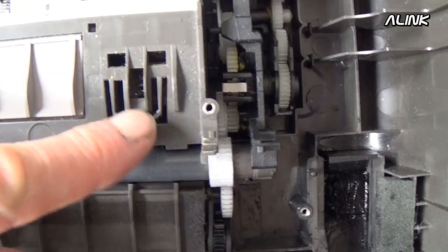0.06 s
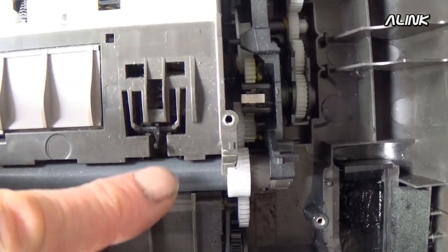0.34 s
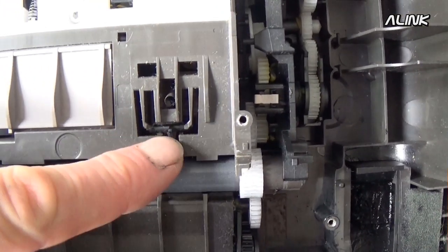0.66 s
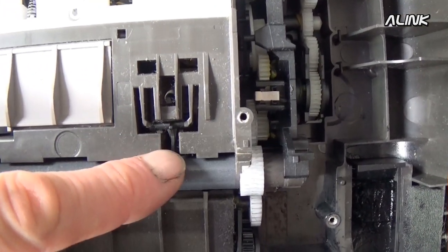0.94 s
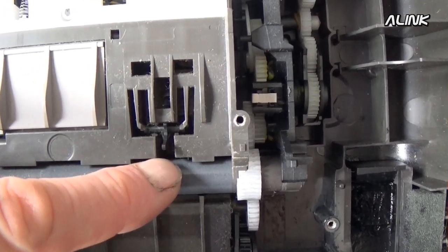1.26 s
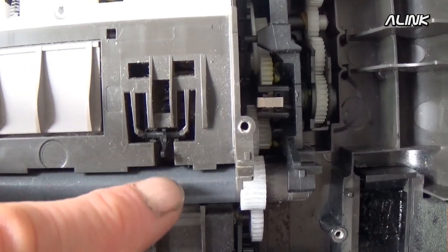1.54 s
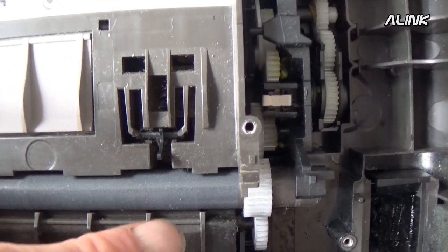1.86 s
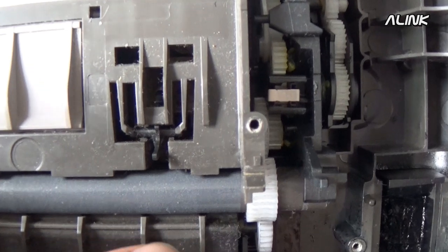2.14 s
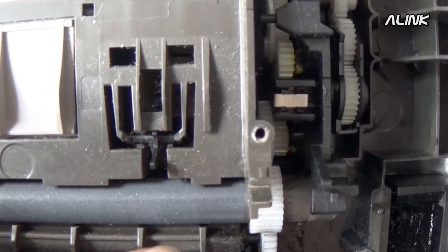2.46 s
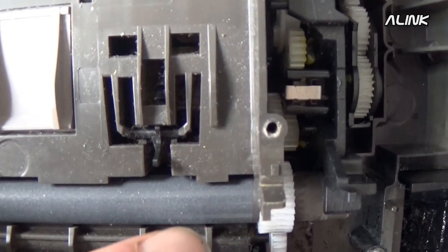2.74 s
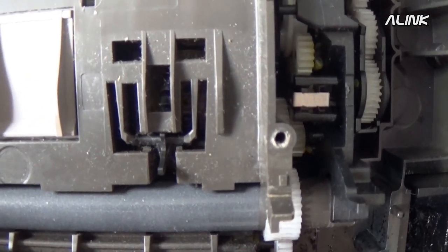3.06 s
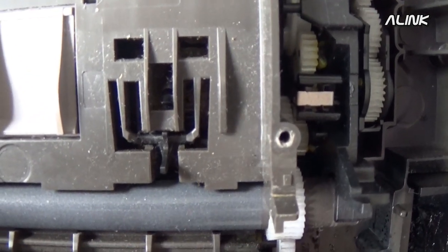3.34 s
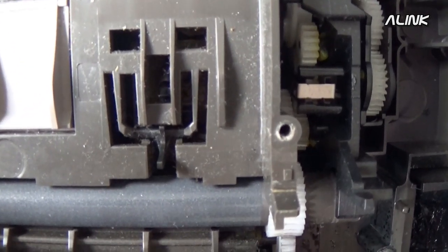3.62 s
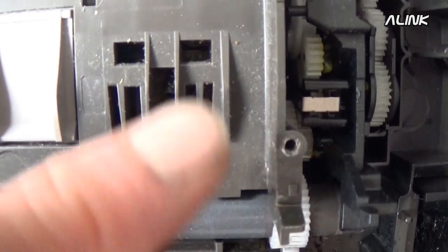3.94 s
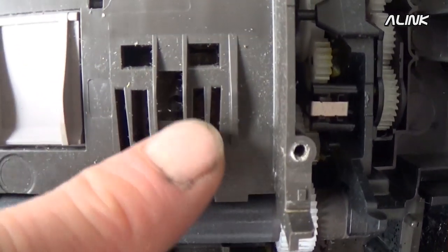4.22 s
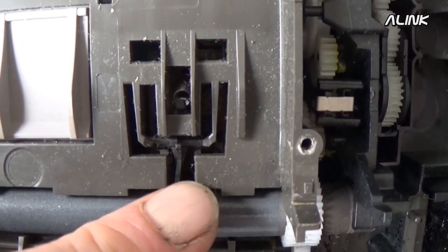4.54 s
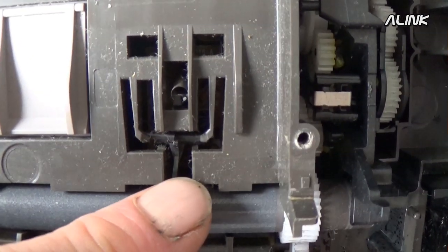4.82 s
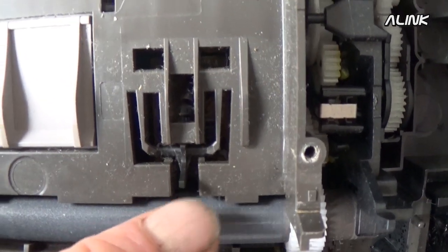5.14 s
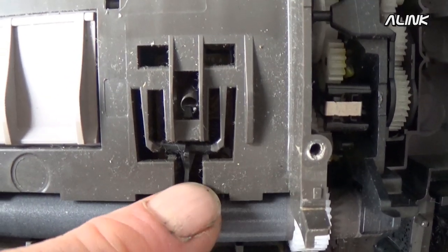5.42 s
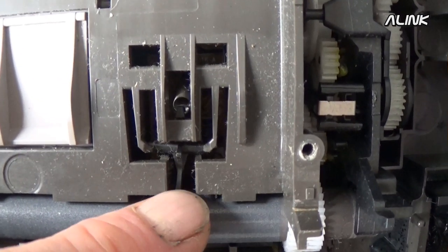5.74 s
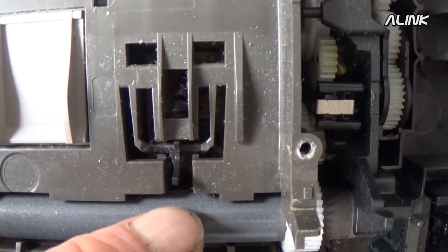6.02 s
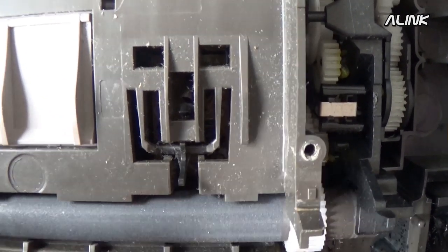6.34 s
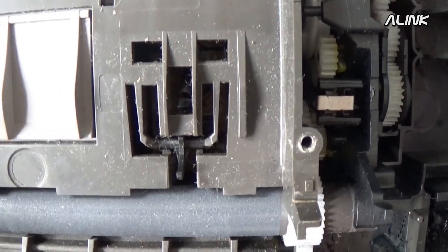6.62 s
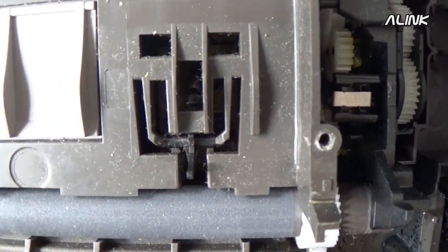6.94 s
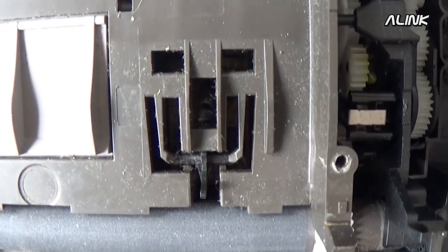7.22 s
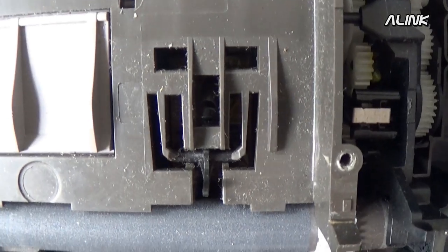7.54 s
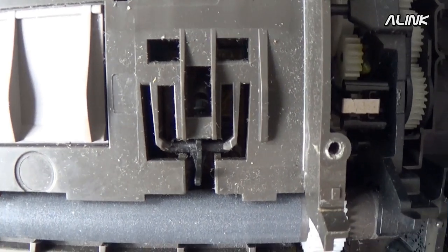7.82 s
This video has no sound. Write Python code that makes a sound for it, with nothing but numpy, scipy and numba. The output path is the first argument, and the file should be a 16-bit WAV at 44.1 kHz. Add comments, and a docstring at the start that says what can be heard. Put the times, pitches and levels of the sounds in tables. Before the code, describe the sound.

Sharp plastic snaps, each with a short metallic ring from a spring, come from a printer's paper lever worked by hand near the microphone. A quiet stretch leaves only room hum, hiss and soft finger rubbing. The lever then clicks, knocks and snaps again, before a loud creak and a dull boom through the workbench. Softer creaks from the feed roller close the sequence.

```python
"""A humming room, with a camera close to an opened inkjet printer.
A finger flicks the spring-loaded paper lever: it clicks, knocks the plastic chassis and leaves its
coil spring ringing. The finger rubs and squeaks on the plastic; then the feed roller is pushed and
creaks by stick-slip, and the bench booms. The camera's limiter ducks everything on the loud snaps."""
import sys
import numpy as np
from scipy import signal
from scipy.fft import irfft, next_fast_len
from scipy.io import wavfile
from scipy.ndimage import uniform_filter1d
from numba import njit

SR = 44100
rng = np.random.default_rng(int(sys.argv[2]) if len(sys.argv) > 2 else 0)


def store_wav(level_fs):
    """Save 16-bit WAV to argv[1]."""
    pcm = np.round(np.clip(np.atleast_2d(level_fs), -1, 1) * 32767)
    wavfile.write(sys.argv[1], SR, pcm.T.astype(np.int16))


N = 351918
T = np.arange(N) / SR

# rumble contour: time_s, relative_db
RUMBLE_CONTOUR = [(0.0, -51.5), (0.82, -48.5), (1.76, -52.5), (4.44, -48), (5.13, -52), (6.36, -49.5),
                  (6.51, -47), (7.34, -46.5), (7.98, -46.5)]
# room hum: pitch_hz, level_db
HUM_TONES = [(64.6, -76), (129.2, -74.5), (177.6, -66), (242.2, -68)]
# spectra of room rumble, microphone hiss, friction grit, lever tick: freq_hz, gain_db
RUMBLE_SPECTRUM = [(30, -31), (41, -9.5), (62, -1), (76, -3), (92, -17.5), (128, -6), (152, -12),
                   (180, -3.5), (220, -15), (290, -13), (400, -20), (700, -19.5), (850, -31.5), (1500, -33)]
HISS_SPECTRUM = [(300, -6), (950, -14), (1400, 3), (1900, -2), (4050, -2.5), (4450, 5.5), (5200, 4.5),
                 (6200, -2), (7500, -2), (10000, -7.5), (16000, -14)]
GRIT_SPECTRUM = [(500, -2), (2000, 2.5), (4500, -1), (6000, -0.5), (9000, 0.5), (11000, 0), (12500, -8),
                 (16000, -4)]
TICK_SPECTRUM = [(400, -24), (1700, -11), (2500, -10.5), (4200, -0.5), (5500, 0.5), (6700, 3), (7300, -0.5),
                 (7900, 6.5), (9100, 3), (9800, -1), (11500, -6), (13000, -11.5), (16000, -46)]
# stereo width of room and printer: freq_hz, side_to_mid_db
ROOM_WIDTH = [(60, -47), (110, -49), (200, -29.5), (380, -15.5), (700, -8.5), (1290, -1.5), (2380, -4),
              (4400, -6), (8120, -9), (15000, -34)]
PRINTER_WIDTH = [(60, -50), (200, -21), (700, -12.5), (1300, -6), (2400, -9), (4400, -7.5), (8100, -9.5),
                 (11000, -18.5), (15000, -48)]
# modes of feed assembly and chassis: freq_hz, gain_db, t60_s
FEED_MODES = [(97, -2.5, 0.29), (206.7, -5.5, 0.25), (429, -2, 0.15), (644, 5.5, 0.13), (695, -2, 0.25),
              (1438, -3, 0.1), (1830, -1.5, 0.12), (2390, -2, 0.15), (2700, 5, 0.069), (2990, 5, 0.059),
              (4370, -8, .06)]
CHASSIS_MODES = [(100, 5, 0.17), (204, -16, 0.19), (393, 13.5, 0.055), (676, 3.5, 0.083), (765, 8, 0.017),
                 (1087, -5, 0.097), (1413, -12, 0.1), (1730, -5, 0.07), (1787, -8, 0.14),
                 (2050, -13, 0.063), (2467, 7, 0.024), (2798, 6.5, 0.021), (3005, -2, 0.058),
                 (3680, -5.5, 0.11), (3970, -10, 0.038)]
# ranges where the spring sings: centre_hz, width_hz, gain_db
SPRING_CLUSTERS = [(1255, 82, -1), (1590, 120, -1.5), (2430, 250, 1.5), (2740, 360, 4.5), (3230, 160, 0),
                   (3830, 690, -1), (5410, 940, -1), (5570, 320, 1), (6320, 560, 2.5), (6780, 160, 3.5),
                   (7660, 280, 3), (8400, 130, 5.5), (8850, 480, 3), (10150, 620, -3), (11500, 270, -5)]
# skin squeaks on plastic: start_s, end_s, pitch_hz, level_db
SQUEAKS = [(2.651, 2.672, 2790, -65), (4.248, 4.344, 6740, -56), (4.333, 4.457, 8430, -52)]
# finger rubs and roller pushes: start_s, end_s, grit_db, groan_db, groan_centre_hz
FINGER_RUBS = [(0.174, 0.258, -54.5, -56.5, 2500), (0.593, 0.82, -64, -59.5, 1490),
               (0.805, 0.86, -48.5, -49.5, 800), (1.131, 1.212, -65, -48.5, 634),
               (2.5, 2.8, -91, -68.5, 1390), (3.623, 3.822, -73, -51.5, 320),
               (4.265, 4.468, -52.5, -62, 1600), (4.453, 4.585, -58, -53, 1800)]
ROLLER_PUSHES = [(6.351, 6.417, -35.5, -28, 425), (6.421, 6.446, -39.5, -33, 402),
                 (6.816, 7.044, -52.5, -51.5, 1090), (7.158, 7.257, -46.5, -43, 1020),
                 (7.311, 7.349, -54, -47.5, 1130), (7.388, 7.946, -63, -63.5, 1400)]
# jolts of the frame: start_s, level_db, centre_hz
FRAME_JOLTS = [(4.879, -31.5, 202), (6.357, -28, 2400), (6.36, -28, 108), (6.814, -32, 473)]
# single lever contacts: start_s, tick_db, knock_db, knock_centre_hz
LEVER_TAPS = [(0.589, -50, -35.5, 1810), (0.746, -46, -42, 900), (0.846, -40, -37, 756),
              (0.8588, -21.5, -22.5, 1550), (1.209, -22, -35, 2000), (2.2524, -52, -41.5, 1110),
              (4.463, -47, -32, 2330), (4.510, -53, -32.5, 1870), (4.896, -55, -26.5, 328),
              (4.9807, -13, -20, 3200), (5.0025, -38, -26.5, 1510), (5.3843, -28.5, -24.5, 3270),
              (5.4108, -38, -30, 2460), (5.430, -50, -27.5, 1430), (5.8109, -59, -28, 2820),
              (6.323, -33.5, -44, 2000)]
# lever forced against the chassis: start_s, tick_db, knock_db, knock_centre_hz, gap_s
LEVER_CHATTERS = [(0.2642, -9, -13.5, 2340, 0.005), (4.875, -15.5, -15, 1630, 0.0034),
                  (5.9366, -23.5, -21, 2560, 0.0024)]
# lever snaps home, freeing the spring: start_s, tick_db, knock_db, spring_db, tilt_db_per_oct, seat_db
LEVER_SNAPS = [(0.283, -5, -22, -28.5, 0.5, -3), (1.2132, -14.5, -37, -30, 0.9, -6),
               (5.0337, -12, -40, -31.5, 0.5, 2), (5.9587, -6.5, -22, -27.5, 1.05, 1)]


def undb(db):
    """Decibels to gain."""
    return 10 ** (np.asarray(db) / 20)


def unit_rms(x):
    """Scale to rms 1."""
    return x / np.sqrt(np.mean(x ** 2) + 1e-18)


def gain_at(spectrum, hz):
    """Gain of a spectrum table, interpolated over log frequency."""
    freq_hz, gain_db = np.transpose(spectrum)
    return undb(np.interp(np.log(hz + 1), np.log(freq_hz), gain_db))


def bell(hz, centre_hz, width_oct):
    """Band-pass gain around centre_hz."""
    return 1 / np.sqrt(1 + (np.log2((hz + 1) / centre_hz) / width_oct) ** 4)


def decay(t, t60_s):
    """Free decay, 60 dB in t60_s."""
    return np.exp(-np.log(1000) * t / t60_s)


def noise(gain, n, width=PRINTER_WIDTH):
    """Stereo noise, rms 1, spectrum gain(hz); near mono in the bass."""
    size = next_fast_len(n)
    hz = np.arange(size // 2 + 1) * SR / size
    mid, side = np.exp(2j * np.pi * rng.random((2, len(hz)))) * gain(hz)
    side = side * gain_at(width, hz)
    return unit_rms(irfft(np.array([mid + side, mid - side]), size)[:, :n])


def drift(rate_hz, n):
    """Smooth random drift, spread near 1."""
    knots = rng.standard_normal(int(n * rate_hz / SR) + 2)
    return np.interp(np.arange(n) * rate_hz / SR, np.arange(len(knots)), knots)


def add(out, start_s, x):
    """Mix x into out at start_s."""
    i = max(int(start_s * SR), 0)
    out[:, i:i + x.shape[1]] += x[:, :N - i]


def stroke(length_s, edge_share=0.025):
    """Trapezoid envelope of a push."""
    t = T[:int(max(length_s, .005) * SR)]
    return np.clip(np.minimum(t, t[-1] - t) / (edge_share * t[-1]), 0, 1)


def room(rumble_gain_db=3, hiss_db=-59.0, waver_db=2.5, waver_rad=0.64):
    """Low rumble, wavering hum, steady microphone hiss."""
    rumble_db = np.interp(T, *np.transpose(RUMBLE_CONTOUR)) + rumble_gain_db
    rumble = noise(lambda f: gain_at(RUMBLE_SPECTRUM, f) / (1 + (f / 2500) ** 2), N, ROOM_WIDTH)
    hum = np.zeros(N)
    for pitch_hz, level_db in HUM_TONES:
        amplitude = np.sqrt(2) * undb(level_db + waver_db * drift(2.2, N))
        hum += amplitude * np.sin(2 * np.pi * pitch_hz * T + waver_rad * drift(6.5, N))
    hiss = noise(lambda f: gain_at(HISS_SPECTRUM, f), N, ROOM_WIDTH)
    return undb(rumble_db) * rumble + hum + undb(hiss_db) * hiss


def camera_tick(first_s=0.0051, rate_hz=25, ring_hz=3500, t60_s=0.012, level_db=-56):
    """Faint regular tick, likely the camera's electronics."""
    age_s = (T - first_s) % (1 / rate_hz)
    return undb(level_db) * np.sin(2 * np.pi * ring_hz * age_s) * decay(age_s, t60_s)


def squeaks(width_oct=0.048):
    """Fingertip drags on plastic: a thin, rough whistle."""
    out = np.zeros((2, N))
    for start_s, end_s, pitch_hz, level_db in SQUEAKS:
        push = stroke(end_s - start_s)
        whistle = noise(lambda f: bell(f, pitch_hz, width_oct), len(push))
        add(out, start_s, undb(level_db) * push * whistle)
    return out


def blow(modes, centre_hz, crowd_db, crowd_t60_s, width_oct=1.186):
    """Struck plastic: main modes over a noise-like crowd of short ones, excited around centre_hz."""
    t = T[:SR // 4]
    hz, gain_db, t60_s = np.transpose(modes)
    strength = undb(gain_db) * bell(hz, centre_hz, width_oct) ** 2
    polarity_rad = np.pi * rng.integers(0, 2, len(hz))
    stereo_rad = np.array([[1], [-1]]) * gain_at(PRINTER_WIDTH, hz) * rng.choice([-1, 1], len(hz))
    partials = np.exp(2j * np.pi * hz[:, None] * t) * decay(t, t60_s[:, None])
    ring = (strength * np.exp(1j * (polarity_rad + stereo_rad)) @ partials).imag
    crowd = noise(lambda f: bell(f, centre_hz, width_oct) ** 2, len(t)) * decay(t, crowd_t60_s)
    return ring / np.linalg.norm(strength) + undb(crowd_db) * crowd


def stick_slip(push, grit_db, top_hz, groan_db, centre_hz, slips_per_s, scatter_db,
               grip_db=1.2, rasp_gain_db=-2, puff_gain_db=-4):
    """Each uneven slip shakes the feed assembly, rasps at the contact and sheds a puff of grit."""
    def grit_gain(hz):
        return gain_at(GRIT_SPECTRUM, hz) / (1 + (hz / top_hz) ** 20)

    n = len(push)
    onsets = np.cumsum(rng.uniform(.3, 1.7, n // 10)) * SR / slips_per_s
    onsets = onsets[onsets < n].astype(int)
    slips = np.zeros(n)
    slips[onsets] = undb(scatter_db * rng.standard_normal(len(onsets)))
    slips = unit_rms(slips * push * undb(grip_db * drift(45, n)))
    groan = blow(FEED_MODES, centre_hz, crowd_db=2, crowd_t60_s=0.018)
    rasp = noise(grit_gain, groan.shape[1]) * decay(T[:groan.shape[1]], t60_s=0.033)
    response = undb(groan_db) * groan / np.linalg.norm(groan[0])
    response += undb(grit_db + rasp_gain_db) * rasp / np.linalg.norm(rasp[0])
    out = signal.fftconvolve((slips - slips.mean())[None], response, axes=1)
    puffs = unit_rms(np.convolve(slips, decay(T[:SR // 100], t60_s=0.027)))
    add(out, 0, undb(grit_db + puff_gain_db) * puffs * noise(grit_gain, len(puffs)))
    return out


def finger_rubs(top_hz=12500):
    """Finger slides on plastic under an even push."""
    out = np.zeros((2, N))
    for start_s, end_s, grit_db, groan_db, centre_hz in FINGER_RUBS:
        push = stroke(end_s - start_s, edge_share=0.1)
        rub = stick_slip(push, grit_db, top_hz, groan_db, centre_hz, slips_per_s=1400, scatter_db=5.5)
        add(out, start_s, rub)
    return out


def roller_creaks(build_db=0.5, ref_top_hz=11900, ref_grit_db=-52, top_hz_per_db=200):
    """Feed roller creaks under a slightly growing push; harder pushes shed brighter grit."""
    out = np.zeros((2, N))
    for start_s, end_s, grit_db, groan_db, centre_hz in ROLLER_PUSHES:
        push = stroke(end_s - start_s, edge_share=0.087)
        push *= undb(np.linspace(0, build_db, len(push)))
        top_hz = ref_top_hz + top_hz_per_db * (grit_db - ref_grit_db)
        creak = stick_slip(push, grit_db, top_hz, groan_db, centre_hz, slips_per_s=800, scatter_db=3.5)
        add(out, start_s, creak)
    return out


def frame_jolts():
    """Jolts ring the feed assembly."""
    out = np.zeros((2, N))
    for start_s, level_db, centre_hz in FRAME_JOLTS:
        add(out, start_s, undb(level_db) * blow(FEED_MODES, centre_hz, crowd_db=-10, crowd_t60_s=0.11))
    return out


def bench_boom(start_s=6.36, centre_hz=100.7, width_oct=0.12, level_db=-35.5, t60_s=1.42):
    """Bench booms after the hardest push."""
    out = np.zeros((2, N))
    boom = noise(lambda f: bell(f, centre_hz, width_oct), SR) * decay(T[:SR], t60_s)
    add(out, start_s, undb(level_db) * boom)
    return out


def coil_spring(count=1600, low_t60_s=1.36, damping_hz=11500, scatter_db=3.0, ripple_db=2,
                seat_hz=2750, seat_oct=0.2, left_to_right_db=-1, lag_s=0.002):
    """Each snap rings the coil's dense, clustered modes; the highest die first."""
    out = np.zeros((2, N))
    hz = np.sort(np.linspace(700, 15500, count) + rng.normal(0, 4, count))
    cluster_power = sum(undb(gain_db) ** 2 / (1 + (2 * (hz - centre_hz) / width_hz) ** 2) ** 1.095
                        for centre_hz, width_hz, gain_db in SPRING_CLUSTERS)
    strength = np.sqrt(cluster_power) * undb(scatter_db * rng.standard_normal(count))
    side = gain_at(PRINTER_WIDTH, hz) * np.exp(2j * np.pi * rng.random(count))
    stereo = np.array([1 + side, 1 - side]) * undb(np.array([[0.5], [-0.5]]) * left_to_right_db)
    for start_s, _, _, spring_db, tilt_db_per_oct, seat_db in LEVER_SNAPS:
        # where the coil is caught favours runs of modes; its plastic seat adds one resonance
        catch_db = ripple_db * unit_rms(uniform_filter1d(rng.standard_normal(count), size=25))
        resonance_db = seat_db * bell(hz, seat_hz, seat_oct)
        tilt_db = tilt_db_per_oct * np.log2(hz / hz.mean())
        amplitude = strength * undb(tilt_db + catch_db + resonance_db)
        amplitude *= undb(spring_db) * np.sqrt(2) / np.linalg.norm(amplitude)
        phasors = stereo * amplitude * np.exp(2j * np.pi * rng.random(count))
        for band in np.array_split(np.arange(count), 10):
            spectrum = np.zeros((2, SR + 1), complex)  # 0.5 Hz bins
            spectrum[:, (2 * hz[band]).astype(int)] = phasors[:, band] * SR
            t60_s = low_t60_s / (1 + (hz[band].mean() / damping_hz) ** 2)
            add(out, start_s + lag_s, irfft(spectrum) * decay(T[:2 * SR], t60_s))
    return out


def lever_contact(tick_db, knock_db, centre_hz, tick_t60_s=0.02, rise_s=0.001,
                  tail_db=-31, tail_t60_s=0.29):
    """Lever ticks brightly with a faint room tail; the chassis answers lower."""
    t = T[:SR // 4]
    envelope = decay(t, tick_t60_s) + undb(tail_db) * decay(t, tail_t60_s)
    tick = noise(lambda f: gain_at(TICK_SPECTRUM, f), len(t)) * envelope
    knock = blow(CHASSIS_MODES, centre_hz, crowd_db=-3.5, crowd_t60_s=0.046)
    return (undb(tick_db) * tick + undb(knock_db) * knock) * (1 - np.exp(-t / rise_s))


def lever_clicks(chatter_count=3, tick_step_db=-5.5, knock_step_db=-1, dulling_ratio=0.77,
                 snap_hz=3400, rebound_s=0.005, rebound_tick_db=-1, rebound_knock_db=6):
    """Taps touch once, chatters dull at each contact, snaps rebound once."""
    out = np.zeros((2, N))
    for start_s, tick_db, knock_db, centre_hz in LEVER_TAPS:
        add(out, start_s, lever_contact(tick_db, knock_db, centre_hz))
    for start_s, tick_db, knock_db, centre_hz, gap_s in LEVER_CHATTERS:
        for k in range(chatter_count):
            dulled_hz = centre_hz * dulling_ratio ** k
            bounce = lever_contact(tick_db + k * tick_step_db, knock_db + k * knock_step_db, dulled_hz)
            add(out, start_s + k * gap_s, bounce)
    for start_s, tick_db, knock_db, *_ in LEVER_SNAPS:
        add(out, start_s, lever_contact(tick_db, knock_db, snap_hz))
        rebound = lever_contact(tick_db + rebound_tick_db, knock_db + rebound_knock_db, snap_hz)
        add(out, start_s + rebound_s, rebound)
    return out


def scene():
    """Stereo sum of background, lever, jolts and friction."""
    background = room() + camera_tick()
    lever = lever_clicks() + coil_spring()
    jolts = frame_jolts() + bench_boom()
    friction = finger_rubs() + roller_creaks() + squeaks()
    return background + lever + jolts + friction


@njit
def follow_peak(x, attack_coeff, release_coeff):
    """Peak follower: jumps up, sinks slowly."""
    out, level = np.empty(len(x)), 0.
    for i in range(len(x)):
        level += (x[i] - level) * (attack_coeff if x[i] > level else release_coeff)
        out[i] = level
    return out


def record(dry, ceiling_db=-14, attack_s=.00006, release_s=0.026, low_cut_hz=28, high_cut_hz=16200):
    """Camera chain: low cut, limiter that ducks on the snaps, high cut."""
    dry = signal.sosfilt(signal.butter(4, low_cut_hz, "high", fs=SR, output="sos"), dry)
    peak = follow_peak(np.abs(dry).max(axis=0), 1 - np.exp(-1 / (attack_s * SR)), 1 / (release_s * SR))
    limited = dry / np.maximum(peak / undb(ceiling_db), 1)
    return signal.sosfilt(signal.ellip(8, .2, 70, high_cut_hz, fs=SR, output="sos"), limited)


dry = scene()
out = record(dry)
store_wav(out)
```